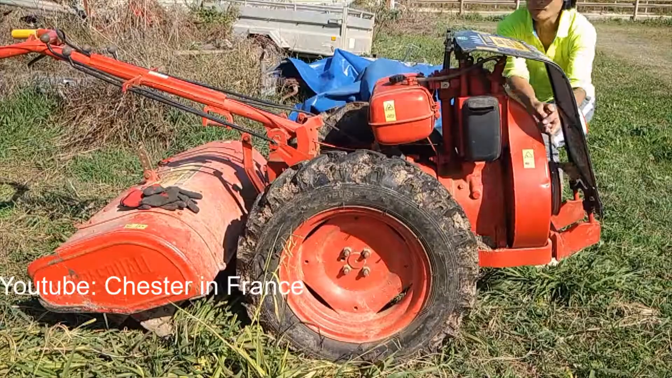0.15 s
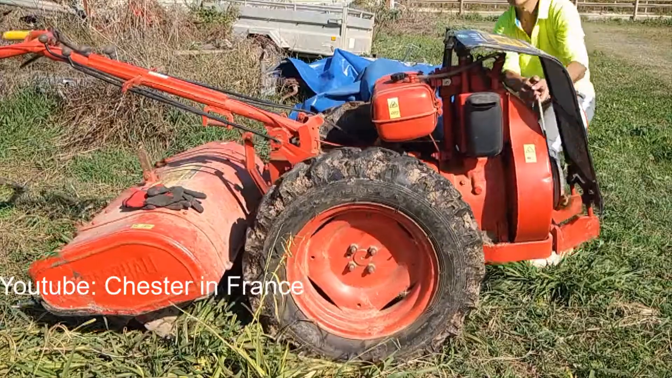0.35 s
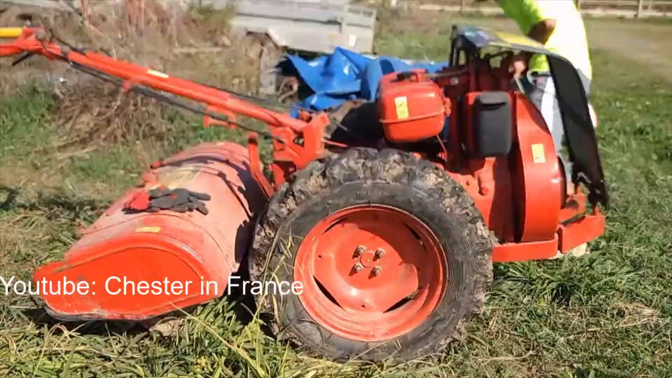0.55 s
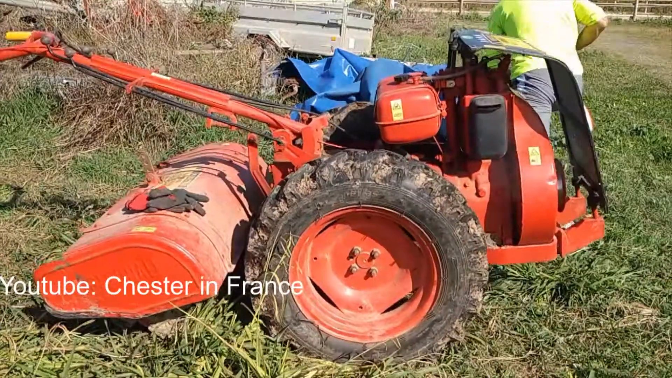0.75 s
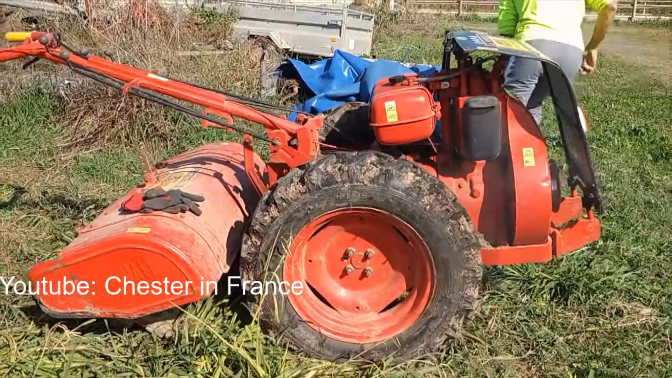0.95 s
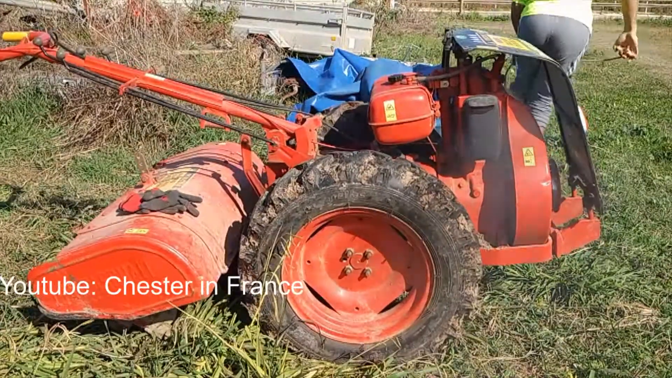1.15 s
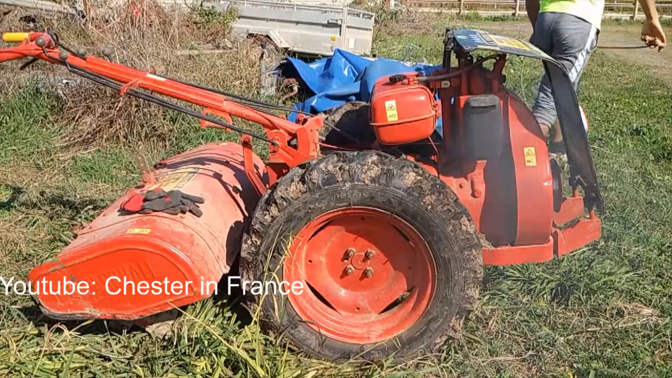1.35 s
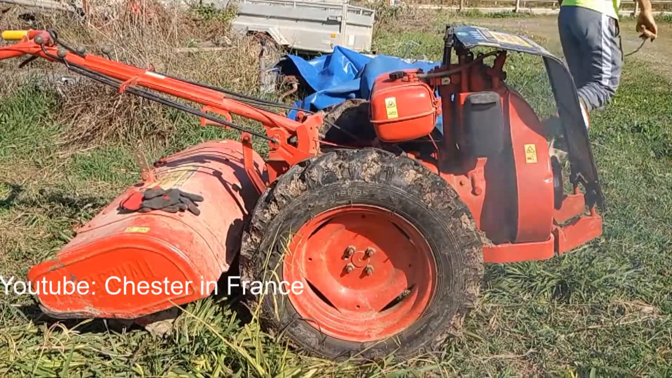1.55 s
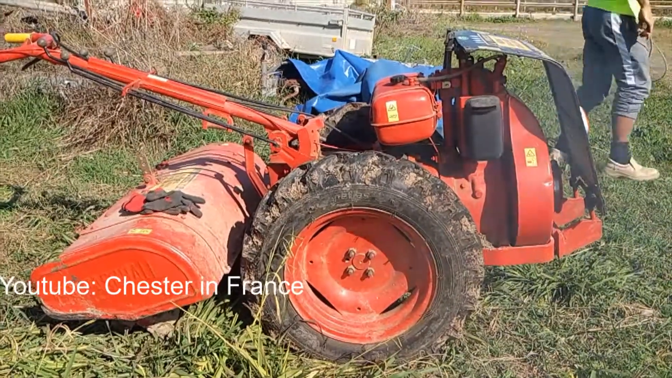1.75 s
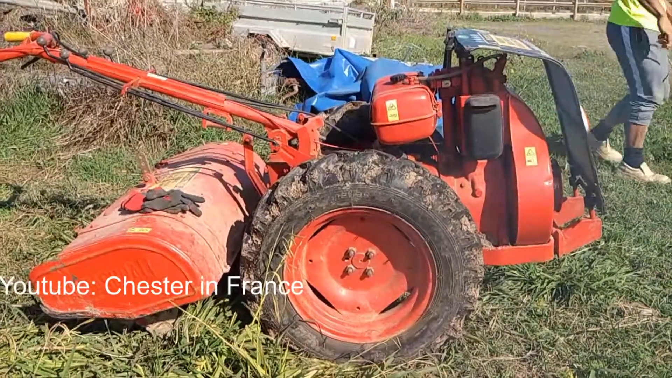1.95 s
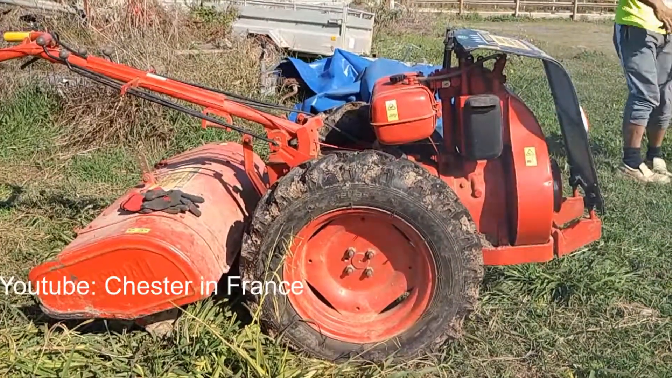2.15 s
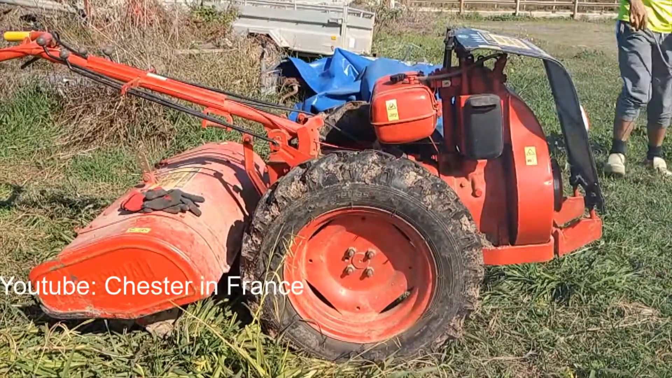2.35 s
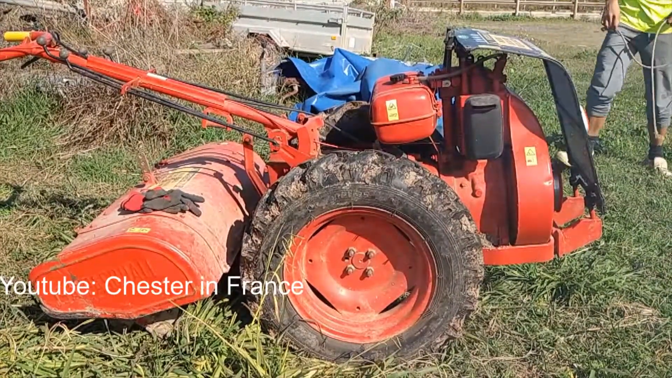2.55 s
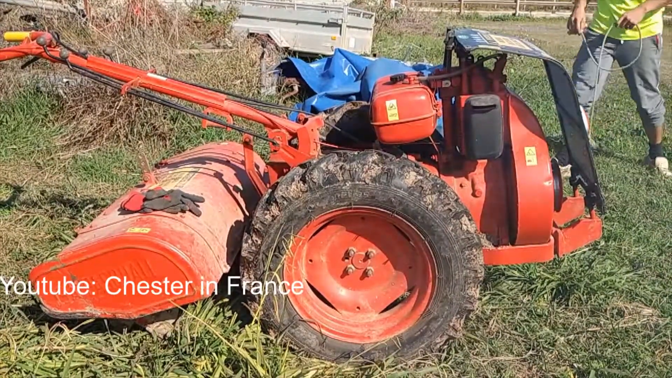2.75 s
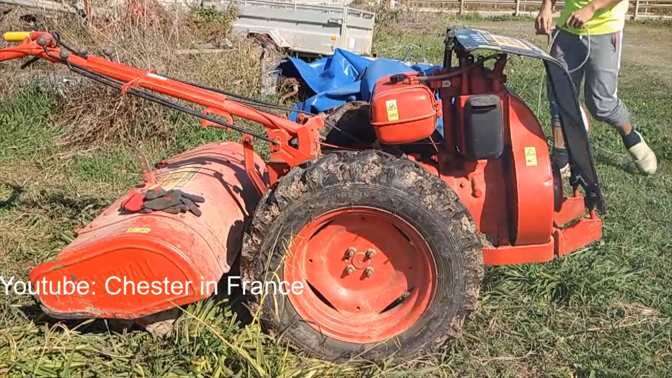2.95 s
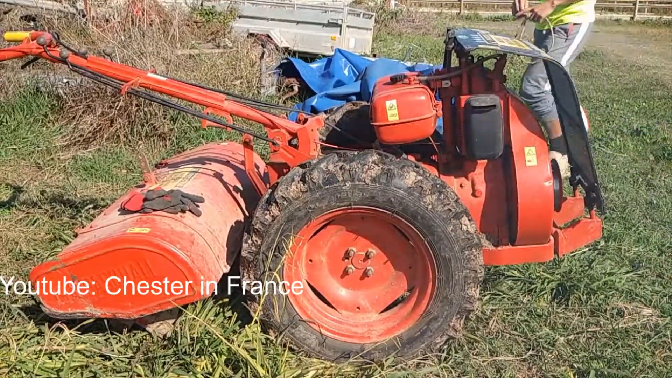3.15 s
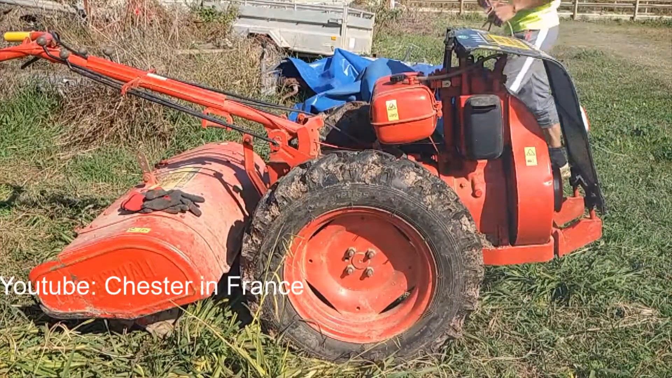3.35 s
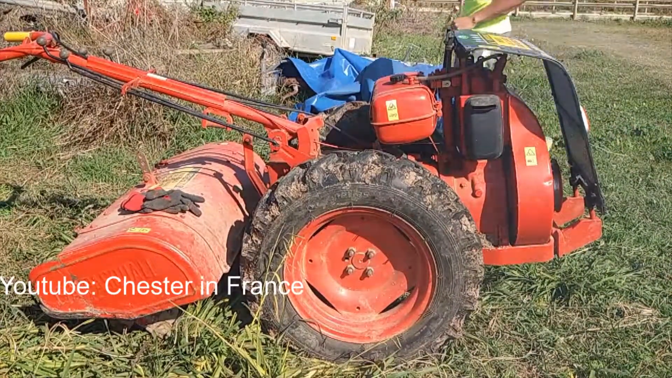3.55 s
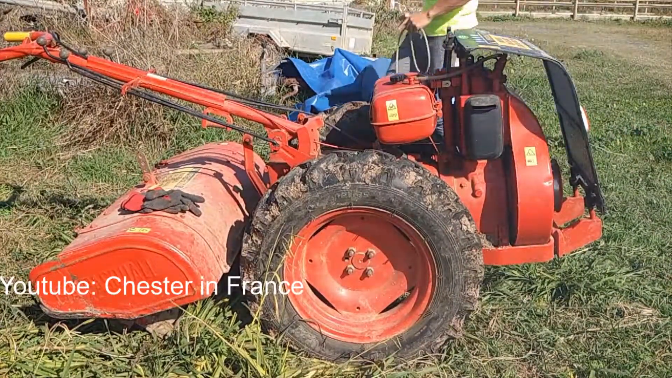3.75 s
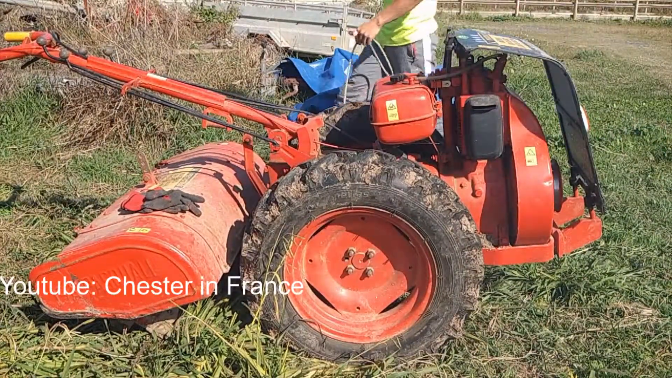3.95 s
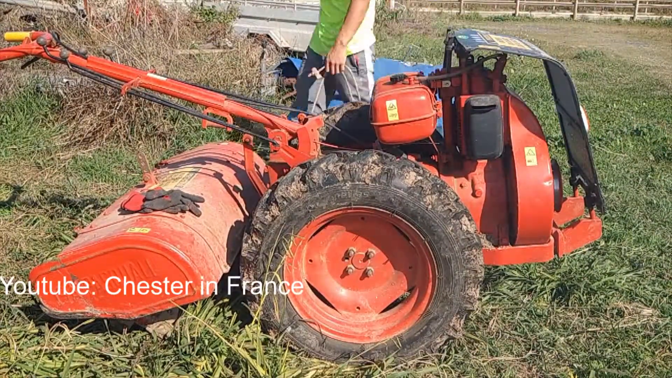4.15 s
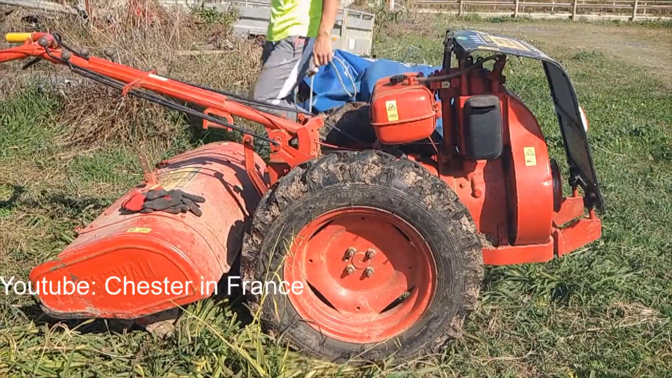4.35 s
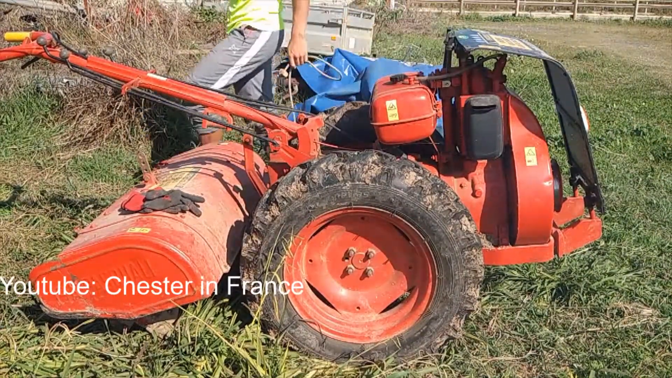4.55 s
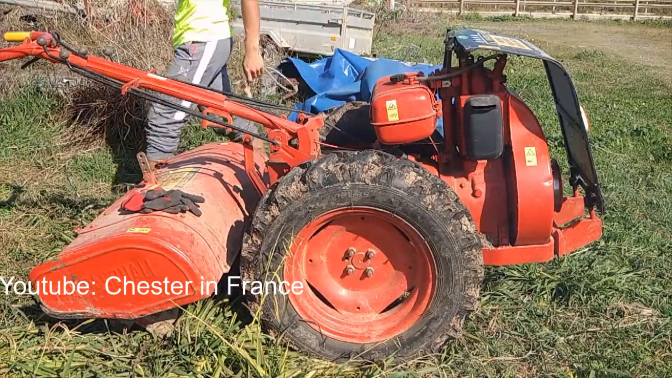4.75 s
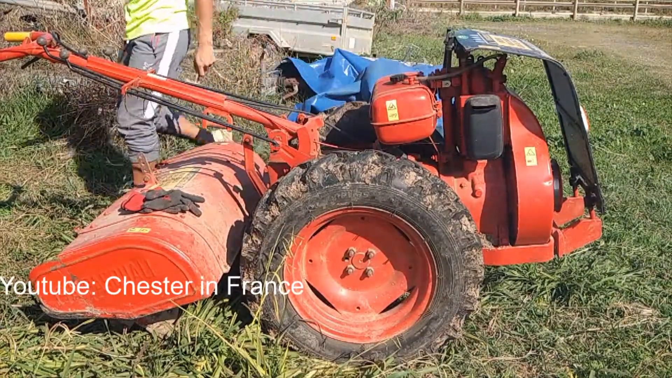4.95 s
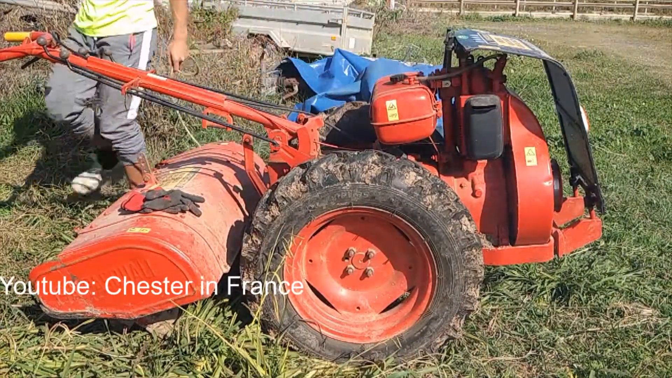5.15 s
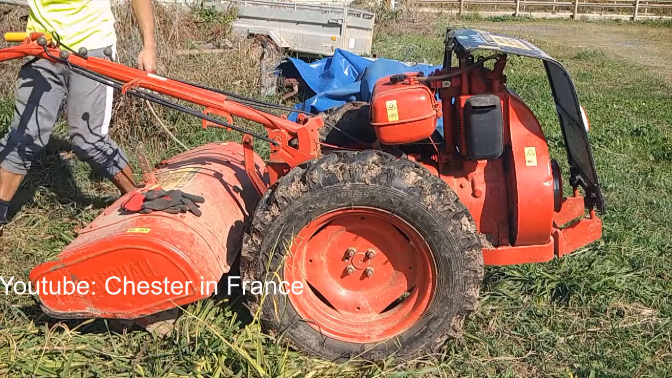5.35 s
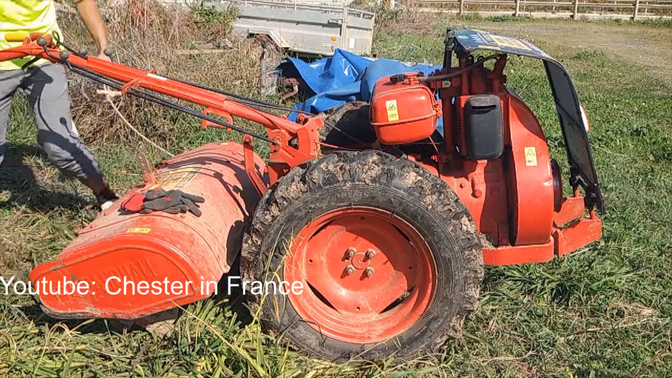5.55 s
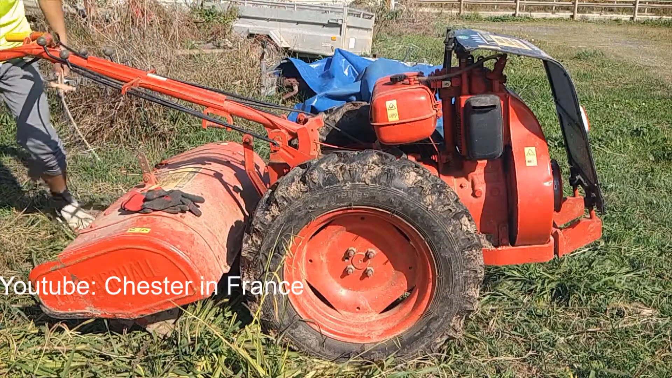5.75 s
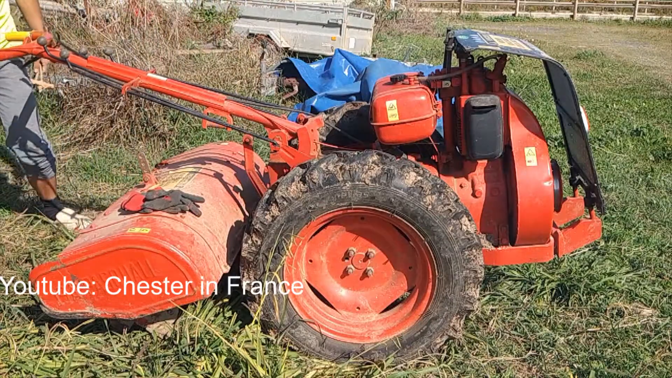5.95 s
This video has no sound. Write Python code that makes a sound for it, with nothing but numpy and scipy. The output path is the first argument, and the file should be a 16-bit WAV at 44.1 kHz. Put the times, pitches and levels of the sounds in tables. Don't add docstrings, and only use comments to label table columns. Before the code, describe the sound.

A single-cylinder diesel is pulled over by rope with scrapes and metallic clacks, catches, speeds up within two seconds, then thumps along steadily outdoors.

```python
import sys
import numpy as np
from scipy import signal
from scipy.fft import rfft, irfft
from scipy.io import wavfile
from scipy.ndimage import uniform_filter1d

SR = 44100
rng = np.random.default_rng(int(sys.argv[2]) if len(sys.argv) > 2 else 0)


def int16_out(signal):
    q = np.round(np.clip(np.atleast_2d(signal).T, -1, 1) * 32767)
    wavfile.write(sys.argv[1], SR, q.astype(np.int16))


def level_to_linear(level):
    exponent = np.asarray(level, float) / 20
    return 10 ** exponent


N = 268569

# (frequency [Hz], density [dB per Hz])
FIELD_SPECTRUM = [(18, -72), (30, -28), (76, 0), (318, -21), (374, -11), (411, -45), (829, -17),
                  (1490, -50), (3000, -70), (10400, -88), (17600, -120)]
FIELD_DB = -64

# (time [s], level [dB])
ROPE_DRAG = [(0.165, -67), (0.213, -53), (0.339, -46), (0.459, -44.5), (0.56, -47)]
# (frequency [Hz], density [dB per Hz])
DRAG_SPECTRUM = [(35, -55), (60, -12), (317, -5), (721, -10.5), (1040, -6), (1160, -18), (2110, -10.5),
                 (3640, -27), (8670, -24), (14000, -42)]
# (time [s], peak [dB], ring frequency [Hz], share to the body [dB], share of ring [dB])
CLACKS = [(0.172, -28, 3930, -27, -2.5), (0.191, -41, 1930, -10, -1), (0.235, -31, 7800, -32, -8),
          (0.276, -43, 1500, 2, 7), (0.36, -29, 2340, -10, 6), (0.392, -42, 1510, -1, -1),
          (0.427, -44, 1760, -11, 14), (0.446, -38, 2100, -10, 2), (0.477, -39, 2340, -20, 8),
          (0.544, -27, 2000, -0.5, -3), (0.562, -23.5, 1990, -3, -19), (0.665, -17, 6300, -19, -3),
          (0.696, -19.5, 8660, -25, 11.5), (0.765, -13, 2190, -33, -25), (0.893, -17.5, 8550, -32, 5),
          (0.929, -14.5, 1560, -38, -16), (1.09, -14, 1980, -27, -20)]
CLACK_T60, CLACK_T60_PER_KHZ = 0.045, 0.013

# (time [s], speed [cycles per s])
SPEED = [(0.33, 4.342), (0.6, 4.222), (0.72, 4.563), (0.95, 6.386), (1.2, 8.136), (1.5, 10.275),
         (1.8, 11.804), (2.1, 12.715), (2.4, 13.059), (2.8, 13.22), (3.2, 13.129), (3.7, 13.185),
         (4.3, 13.145), (4.8, 12.963), (5.3, 12.799), (6.1, 12.915)]
# (time [s], force of the burning [dB], fuel rack [0-1])
BURN = [(.57, -34, 0.06), (.68, -33, 0.98), (.79, -26.5, 0.71), (.96, -20.5, 0.4), (1.2, -20, 0.62),
        (1.5, -25, 1), (1.8, -22.5, 0.81), (2.3, -19, 0.04), (2.7, -20.5, 0.05), (3.5, -22, 0),
        (4.7, -24.5, 0), (6.1, -24, 0)]
IDLE_HZ, IDLE_BURN_DB = 13.1, -23
CATCH_S, UNFIRED_DB = .55, -31
IGNITION_LAG = .0035
# (level at idle [dB], slope [dB per octave of speed], added at full fuel [dB], share of burning force)
THUMP = (-22, -0.5, -4, 0.3)
RUSH = (-24, 2.5, 1, 0.34)
RATTLE = (-19.5, 8.5, -0.5, -0.4)
CRACK = (-37, -10.5, 22.5, 0.27)
BLOWER = (-38.5, 4.5, 2.5, 0.64)

# (frequency [Hz], decay time T60 [s], level under the knock
# [dB], added at full fuel [dB], level under the rattle [dB])
BLOCK_MODES = [(465, 0.073, -61.5, -31, -8), (560, 0.061, -61.5, 14, -2), (649.8, 0.21, -7.5, 3.5, -8),
               (708, 0.14, -26, 7, -12), (853.4, 0.22, -10.5, 11, -26), (926.6, 0.077, -3, 8, -25),
               (954.7, 0.095, 0.5, 0.5, -10), (987, 0.11, -4, 4, -7.5), (1039, 0.38, -27, 22, -20),
               (1125, 0.21, -8.5, -12, -4), (1210, 0.042, -39, -3, -5.5), (1245, 0.1, -5.5, 5, -6),
               (1267.4, 0.09, -18.5, 22, -2.5), (1287.7, 0.076, 1, 3.5, -2),
               (1396, 0.062, -6.5, 22.5, -35), (1517, 0.43, -25, 20, -3), (1560, 0.1, -15.5, 21, -2.5),
             (1626, 0.12, -5, 3, -15), (1830, 0.026, -44, 7, -30), (1990, 0.019, 4, 9.5, -37),
             (2114, 0.049, -10, -1, 1), (2175, 0.13, 0.5, 1, -2), (2420, 0.23, -43, -8, -23),
             (2438, 0.03, -14.5, 22.5, -13), (2538, 0.11, -34, -15, -7.5), (2717, 0.21, -19, -17, -14),
             (3180, 0.072, -14, -25, -19), (4135, 0.086, -40, -4, -8.5)]
# (share of the cycle, level [dB])
SHAKE = [(0, -32), (.06, -13), (.2, -4.5), (.3, -7.5), (.55, -5.5), (.66, -8.5), (.8, -9.5), (.87, -15.5),
         (1, -15)]
LOOSE_HZ, LOOSE_DB = 8, -33

# (frequency [Hz], density [dB per Hz])
HISS_SPECTRUM = [(110, -19.5), (300, -7), (600, -9.5), (1000, -6), (1800, -7), (2500, -10), (3300, -20),
                 (5000, -15), (7000, -16.5), (8500, -10), (9600, -19.5), (11500, -28.5), (14000, -32),
                 (16300, -32)]
# (frequency [Hz], bandwidth [Hz], level [dB])
JET_RESONANCES = [(3640, 210, 9), (4180, 250, 5), (4540, 150, 0), (6300, 19, -2), (7640, 17, 3),
                  (7640, 1300, -26)]
# (share of the cycle, level [dB])
FLOW = [(0, 0.5), (.12, -23), (.235, -8.5), (.255, 3), (.29, 4.5), (.38, -1.5), (.5, 1), (.64, -10),
        (1, -13)]
# (share of the cycle, level [dB], decay time T60 [s])
TICKS = [
    (.545, -3.5, 0.039),
    (.825, -3.5, 0.023),
    (0.024, -4.5, 0.024),
    (.05, -10.5, 0.22),
]
# (frequency [Hz], density [dB per Hz])
BLAST_SPECTRUM = [(90, -40), (250, 3), (500, -8), (1300, 0), (2500, -4.5), (4000, -12), (6000, -10),
                  (8300, -2), (10500, -12.5), (13000, -19.5), (16300, -16)]
CRACK_T60, CRACK_FUEL_T60, CRACK_RACK = 0.035, 0.044, 0.35
VALVE_OPENS, BLOW_DOWN, OVERLAP = 0.26, .34, .44
BLOW_LEAD = .016

# (time [s], frequency [Hz], decay time T60 [s], level [dB])
PINGS = [
    (.546, 3080, 0.18, -29),
    (.546, 5050, 0.086, -30),
    (.547, 8550, 0.092, -27),
    (.668, 6400, 0.13, -23),
    (0.701, 5600, 0.11, -23),
    (.9, 6200, .15, -45),
    (.93, 6200, 0.18, -30),
]
# (frequency [Hz], decay time T60 [s], level at blow-down [dB],
# added at full fuel [dB], level at valve overlap [dB])
CAVITIES = [(77.5, 0.063, -10, 15.5, -18), (101.6, 0.071, -3.5, 6.5, -16.5),
            (149.2, 0.23, -10.5, 6.5, -8.5), (280.6, 0.18, -7, -5, -2.5), (360.3, 0.089, -4, 12, -5),
            (412.7, 0.05, 1, 8.5, 4.5), (482, 0.064, 1, 0, 1), (532.5, 0.066, -11, 16, -3.5),
            (662, 0.22, -13, -36, -15), (859, 0.18, -30, -13, 0.5)]
FRAME_HZ, FRAME_T60, FRAME_DB = 173.2, 0.12, -27
# (frequency [Hz], density [dB per Hz])
COOLING_SPECTRUM = [(300, -40), (1500, -16), (3000, 5), (6000, -2), (8500, -7), (10500, -9), (15500, -7),
                    (16300, -2)]
# (frequency [Hz], decay time T60 [s], level [dB], fades by [s])
COWL_PANELS = [
    (1020, 0.44, -32.5, 1.47),
    (1554, .5, -34, 2.4),
]
BAND_EDGE_HZ = 15650


def evened(x):
    return x / np.sqrt(np.mean(x ** 2) + 1e-20)


def coloured(points):
    even_length = N + N % 2
    hz = np.fft.rfftfreq(even_length, 1 / SR)
    f, db = np.transpose(points)
    gain = level_to_linear(np.interp(np.log(hz + 1), np.log(f + 1), db))
    return evened(irfft(rfft(rng.standard_normal(even_length)) * gain)[:N])


def flutter(size, depth_db):
    return level_to_linear(depth_db * evened(uniform_filter1d(rng.standard_normal(N), size)))


def field():
    return level_to_linear(FIELD_DB) * coloured(FIELD_SPECTRUM) * flutter(size=1500, depth_db=2)


def patchy(x, depth_db):
    z = signal.stft(x, nperseg=256, noverlap=192)[2]
    lumps = rng.standard_normal(z.shape[::-1])
    lumps = uniform_filter1d(lumps, 14, axis=0)
    lumps = uniform_filter1d(lumps, 3, axis=1).T
    z = z * level_to_linear(depth_db * evened(lumps))
    return evened(signal.istft(z, nperseg=256, noverlap=192)[1][:N])


def mode(x, hz, t60):
    r = 10 ** (-3 / (max(t60, .004) * SR))
    w = 2 * np.pi * hz / SR
    return signal.lfilter([0, r * np.sin(w)], [1, -2 * r * np.cos(w), r * r], x)


def clack_t60(hz):
    return CLACK_T60 + CLACK_T60_PER_KHZ * hz / 1000


def starter(t):
    drag_gain = level_to_linear(np.interp(t, *np.transpose(ROPE_DRAG), left=-99, right=-99))
    out = drag_gain * patchy(coloured(DRAG_SPECTRUM), depth_db=3.5)
    tick, u = coloured(BLAST_SPECTRUM), np.arange(6000) / SR
    for s, db, hz, _, ring_db in CLACKS:
        at = round(s * SR)
        part = tick[at:at + 6000]
        snap = 1 + (2.5 if s < .5 else .6) * np.exp(-u / .0015)
        decay = level_to_linear(db - 10.5 - 60 * u / clack_t60(hz))
        ring = level_to_linear(ring_db) * evened(mode(part, hz, 0.013))
        out[at:at + 6000] += decay * snap * (part + ring)
    return out


def train(times, sizes):
    x, at = np.zeros(N), np.round(times * SR).astype(int)
    inside = (at >= 0) & (at < N)
    np.add.at(x, at[inside], sizes[inside])
    return x


def click(s, db):
    return train(np.array([s]), level_to_linear(np.array([db])))


def dying(x, t60):
    return signal.lfilter([1], [1, -10 ** (-3 / (max(t60, .002) * SR))], x)


def speed(t):
    return np.interp(t, *np.transpose(SPEED))


def crank():
    t = np.arange(SPEED[0][0], N / SR + .3, 1 / 10000)
    turns = np.cumsum(speed(t)) / 10000 - 1
    whole = np.arange(-1, int(turns[-1]) + 1)
    return np.interp(whole, turns, t), whole


def moments(share, lag=IGNITION_LAG):
    s, turns = crank()
    return np.interp(np.arange(turns[0], turns[-1] - 1) + share, turns, s) - lag


def by_share(points, t):
    share = np.interp(t + IGNITION_LAG, *crank()) % 1
    return level_to_linear(np.interp(share, *np.transpose(points)))


def force_db(t):
    s, db, _ = np.transpose(BURN)
    return np.interp(t, s, db)


def burn_db(t):
    return force_db(t) + UNFIRED_DB * (t < CATCH_S)


def fuel(t):
    s, _, rack = np.transpose(BURN)
    return np.clip(np.interp(t, s, rack), 0, 1)


def law_db(law, t, rack):
    idle_db, octave_db, fuel_db, share = law
    level_db = idle_db + octave_db * np.log2(speed(t) / IDLE_HZ) + fuel_db * rack
    level_db = level_db + share * (force_db(t) - IDLE_BURN_DB)
    return level_db + UNFIRED_DB * (t < CATCH_S)


def pressure_ripple():
    ripple = rng.standard_normal(900) * level_to_linear(-60 * np.arange(900) / SR / 0.04585)
    for _ in range(4):
        z = rfft(ripple, 2048)
        ripple = irfft(z / (abs(z) + 1e-9))[:900]
    return uniform_filter1d(ripple * level_to_linear(6.0), size=6)


def block(t):
    fire, modes = moments(0, lag=0), BLOCK_MODES
    ripple = pressure_ripple()
    still_db = LOOSE_DB * np.clip(LOOSE_HZ - speed(t), 0, 1) * (t > CATCH_S)
    shake = level_to_linear(law_db(RATTLE, t, fuel(t)) + still_db) * by_share(SHAKE, t) * flutter(size=200, depth_db=2.0)
    for s, db, hz, body_db, _ in CLACKS:
        shake += dying(click(s, db + body_db), clack_t60(hz))
    shake += dying(train(fire, level_to_linear(burn_db(fire) - 19.5)), 0.083)
    shake *= rng.standard_normal(N)
    knock, rattle = np.zeros((2, N))
    for hz, ring, knock_db, fuel_db, rattle_db in modes:
        chance_db = 2.0 * rng.standard_normal(len(fire))
        size = level_to_linear(burn_db(fire) + knock_db + fuel_db * fuel(fire) + chance_db + 1)
        knock += mode(train(fire, size), hz, ring)
        rattle += level_to_linear(rattle_db - 36) / np.sqrt(max(ring, .01)) * mode(shake, hz, ring)
    metal = signal.oaconvolve(knock, ripple)[:N] + rattle
    return signal.sosfilt(signal.butter(N=3, Wn=330, btype="high", fs=SR, output="sos"), metal)


def valve_crack(t):
    opened = moments(VALVE_OPENS)
    last = np.clip(np.searchsorted(opened, t) - 1, 0, None)
    since = np.maximum(t - opened[last], 0)
    level_db = law_db(CRACK, opened, np.tanh(fuel(opened) / CRACK_RACK))
    level_db = (level_db + 0.18 * rng.standard_normal(len(opened)))[last]
    decay = level_to_linear(level_db - 60 * since / (CRACK_T60 + CRACK_FUEL_T60 * fuel(t)))
    rise = 1 - np.exp(-since / .003)
    return decay * rise * patchy(coloured(BLAST_SPECTRUM), depth_db=1.5)


def gas(t):
    air, jet = coloured(HISS_SPECTRUM), coloured(HISS_SPECTRUM)
    whistle = sum(level_to_linear(db) * evened(mode(jet, hz, 2.2 / width)) for hz, width, db in JET_RESONANCES)
    air += level_to_linear(-12) * evened(whistle)
    gate = by_share(FLOW, t) * flutter(size=250, depth_db=1.5)
    for share, db, t60 in TICKS:
        at = moments(share)
        gate += dying(train(at, level_to_linear(db + 0.93 * rng.standard_normal(len(at)))), t60)
    hiss = patchy(air, depth_db=2.5) * level_to_linear(law_db(RUSH, t, fuel(t)) + 4.5) * gate * (t > .35)
    return hiss + valve_crack(t)


def pings():
    return sum(mode(click(s, db), hz, t60) for s, hz, t60, db in PINGS)


def swell(push, hz, ring):
    turns = np.arange(-.75, .75, hz / SR)
    window = np.cos(np.pi * turns / 1.5) ** 2
    fill = window * np.cos(2 * np.pi * turns) * 2.7 * hz / SR
    return mode(signal.oaconvolve(push, fill)[:N], hz, ring)


def silencer():
    blow, lap, fire = moments(BLOW_DOWN, lag=BLOW_LEAD), moments(OVERLAP, lag=0), moments(0)
    out = swell(train(fire, level_to_linear(FRAME_DB) * (fire > .5)), FRAME_HZ, FRAME_T60)
    caught = np.arange(N) > .55 * SR
    for k, (hz, ring, blow_db, fuel_db, lap_db) in enumerate(CAVITIES):
        blow_chance_db, lap_chance_db = .8 * rng.standard_normal((2, len(blow)))
        blow_level = law_db(THUMP, blow, fuel(blow)) + blow_db + fuel_db * fuel(blow)
        lap_level = law_db(THUMP, lap, fuel(lap)) + lap_db - 9.0 * fuel(lap)
        push = train(blow, level_to_linear(blow_level + blow_chance_db)) + train(lap, level_to_linear(lap_level + lap_chance_db))
        out += (-1) ** k * level_to_linear(2.5) * caught * swell(push, hz, ring)
    return out


def blower(t):
    return level_to_linear(law_db(BLOWER, t, fuel(t))) * patchy(coloured(COOLING_SPECTRUM), depth_db=4.5) * (t > CATCH_S)


def cowl(t):
    out = np.zeros(N)
    for hz, t60, db, until in COWL_PANELS:
        level_db = np.interp(t, [.7, .85, until - .2, until + .3], [-51, -3, 0.5, -32], left=-99)
        out += level_to_linear(db + level_db) * evened(mode(rng.standard_normal(N), hz, t60))
    return out


def scene():
    t = np.arange(N) / SR
    quiet = field()
    engine = starter(t) + block(t) + gas(t) + pings() + silencer() + blower(t) + cowl(t)
    engine[130:] += 0.072 * engine[:-130]
    return (engine + quiet)[None]


def band_limit(x):
    return signal.sosfilt(signal.butter(12, 16430, fs=SR, output="sos"), x)


def record(dry):
    ceiling = .95
    limited = dry / (1 + (abs(dry) / ceiling) ** 4) ** .25
    x = signal.sosfilt(signal.butter(N=2, Wn=60, btype="high", fs=SR, output="sos"), limited)
    edge = signal.firwin(511, BAND_EDGE_HZ, window=("kaiser", 9), fs=SR)
    x = signal.oaconvolve(x, edge[None], "same")
    return band_limit(x)


dry = scene()
out = record(dry)
int16_out(out)
```